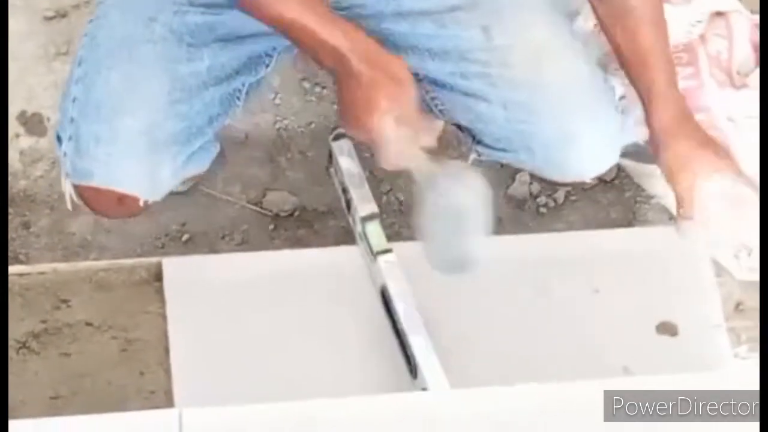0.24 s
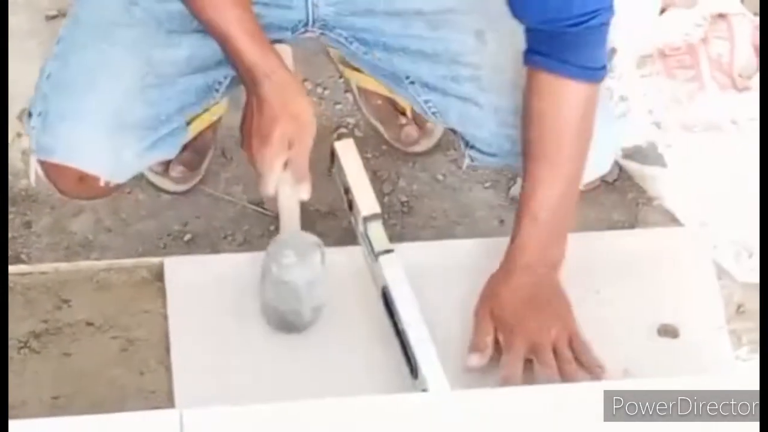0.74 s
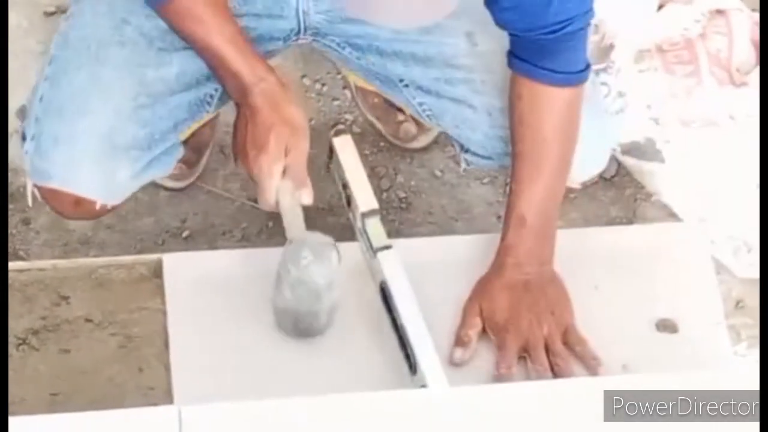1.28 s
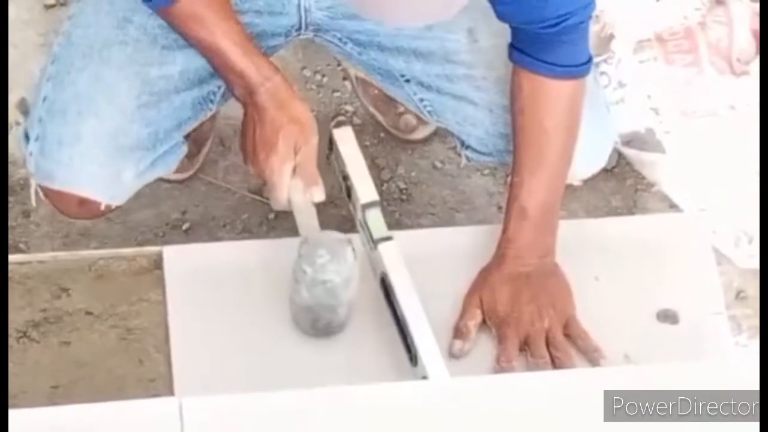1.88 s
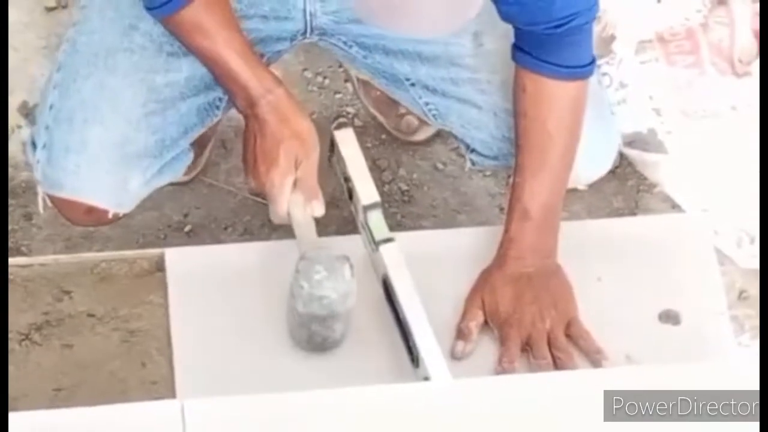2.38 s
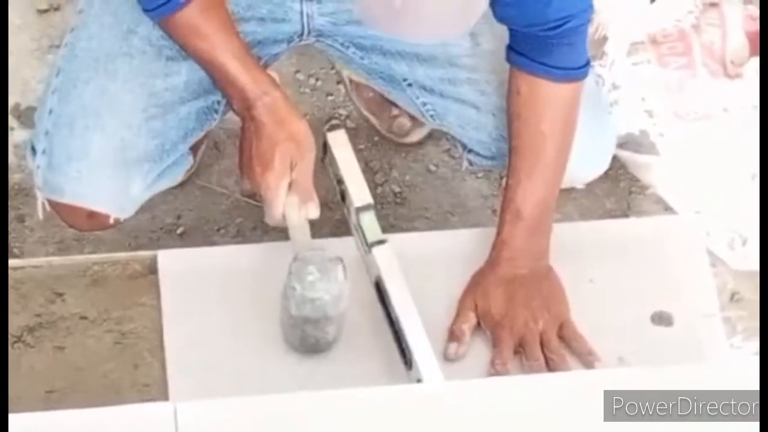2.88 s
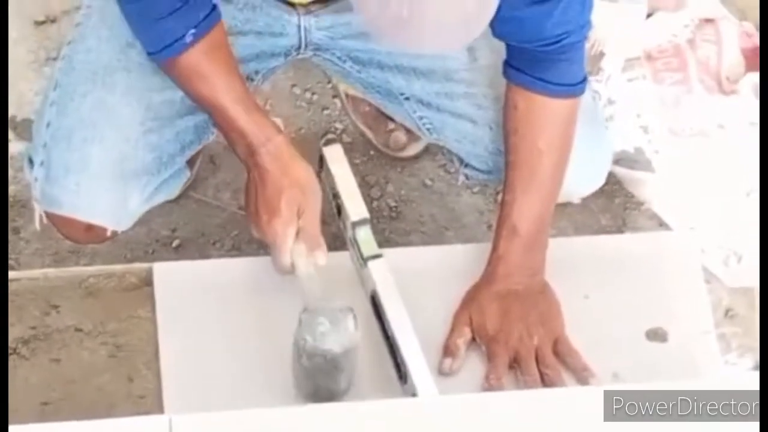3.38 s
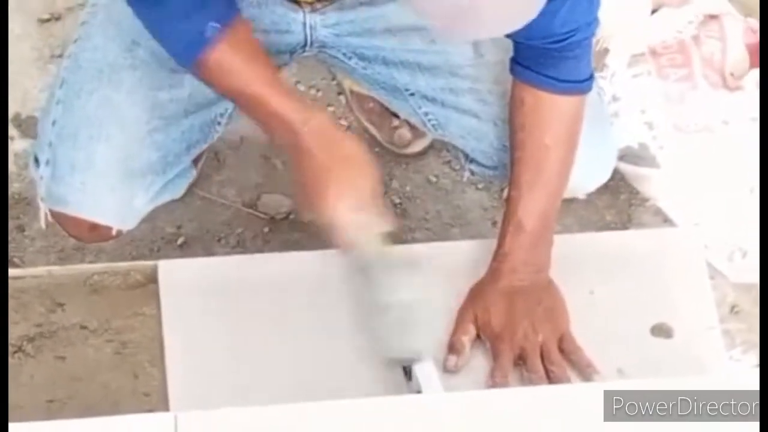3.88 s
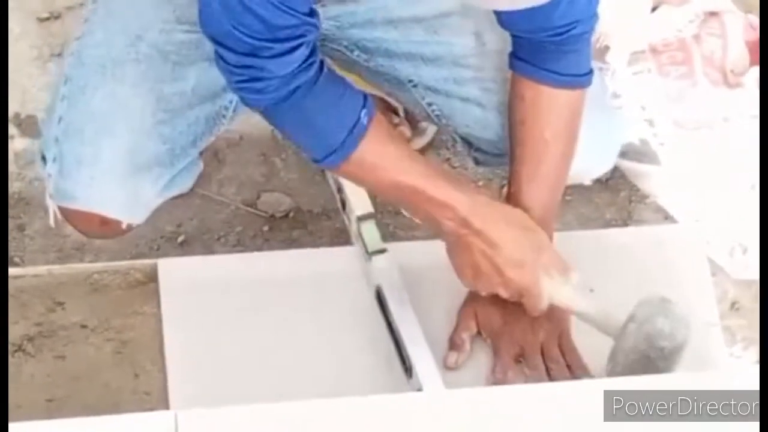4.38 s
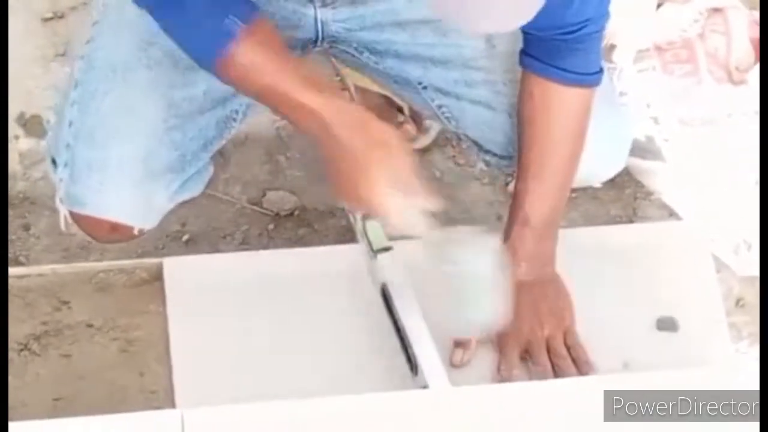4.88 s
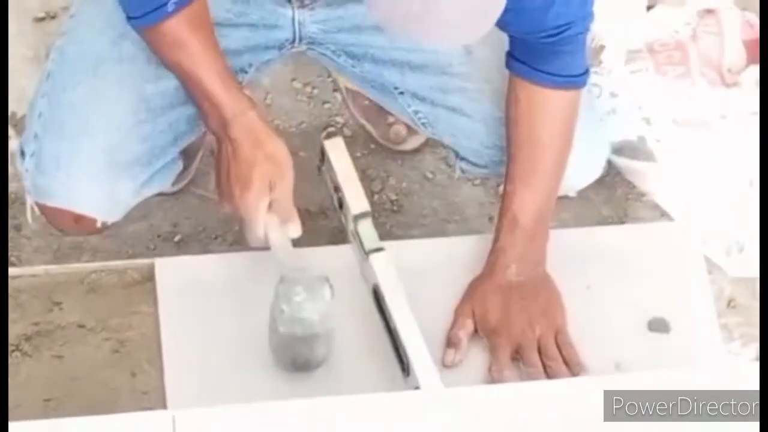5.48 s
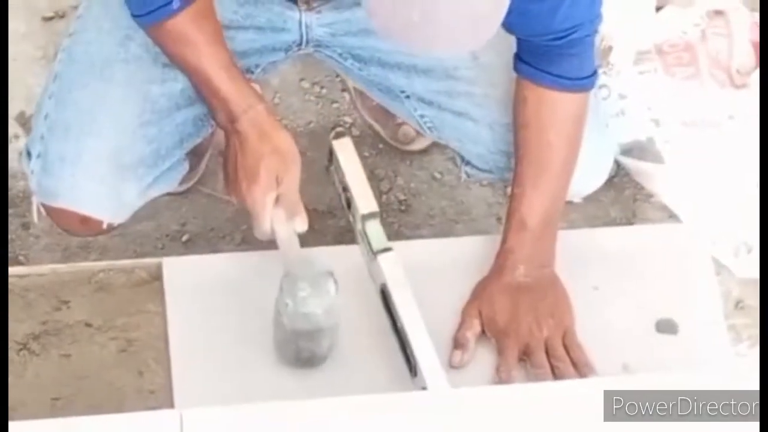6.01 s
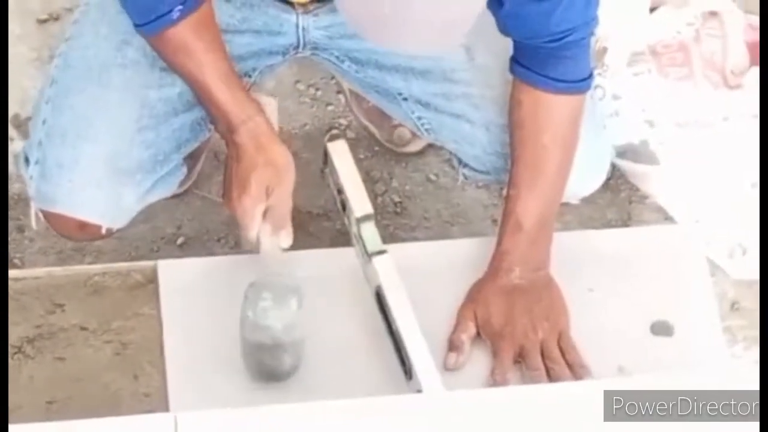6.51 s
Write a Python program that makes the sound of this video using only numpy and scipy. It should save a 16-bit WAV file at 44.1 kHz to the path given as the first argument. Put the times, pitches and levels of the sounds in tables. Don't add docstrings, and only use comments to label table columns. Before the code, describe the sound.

In a bare concrete stairwell, a rubber mallet gives light taps on a tile, then three heavier blows and three soft edge taps. Grit scrapes during a pause, then a steady run of firm thuds follows. It stops; grit scuffs, a hard tool clacks and hollow knocks end it. A small nearby microphone catches the hard wall echoes over faint site noise.

```python
import sys
import numpy as np
from scipy import signal
from scipy.io import wavfile
from scipy.ndimage import uniform_filter1d

SR = 44100
rng = np.random.default_rng(int(sys.argv[2]) if len(sys.argv) > 2 else 0)


def magnitude_from_level(level_db):
    exponent = np.asarray(level_db, float) / 20
    return 10 ** exponent


def persist_wave(psi):
    counts = np.round(np.clip(psi, -1, 1) * 32767).astype(np.int16)
    wavfile.write(sys.argv[1], SR, np.atleast_2d(counts).T)


N = 297596

# (time [s], thud peak [dB], tile ring [dB], slap [dB], shaken grit [dB])
BLOWS = [(-0.04, -28, -44, -35.5, -54), (0.1122, -18.5, -45, -39.5, -63), (0.3241, -15.5, -40, -34, -50),
         (0.4839, -20, -47, -41.5, -59), (0.7212, -21.5, -46.5, -41.5, -65), (0.9404, -15, -43, -33.5, -56),
         (1.2649, -6.5, -30, -28.5, -43), (1.4792, -6.5, -31.5, -31, -49.5),
         (1.6666, -2.5, -26, -23.5, -35.5), (3.1915, -8, -39.5, -30.5, -49),
         (3.4021, -4.5, -38.5, -28, -46.5), (3.6076, -5.5, -36, -27.5, -41), (3.8052, -6, -37, -28, -44.5),
         (3.997, -6, -49, -27, -41), (4.1763, -5.5, -38, -28, -50.5), (4.3497, -6.5, -51, -28, -43),
         (4.5721, -6.5, -56, -32.5, -48.5), (4.7456, -7, -41.5, -33, -50), (4.8917, -10.5, -38, -37.5, -55)]
# (time [s], thud peak [dB], tile ring [dB], slap [dB],
# shaken grit [dB])
FAR_BLOWS = [
    (2.2148, -16, -75, -34, -51),
    (2.4153, -19, -63, -34, -59),
    (2.5870, -21.5, -65, -36.5, -47.5),
]


def evened(x):
    return x / np.sqrt(np.mean(x ** 2) + 1e-20)


def read(points, hz):
    f, value = np.transpose(points)
    return np.interp(np.log(hz + 1), np.log(f + 1), value)


def add(mix, s, sound):
    part = mix[round(s * SR):][:len(sound)]
    part += sound[:len(part)]


def coloured(x, points):
    log_gain = np.log(magnitude_from_level(read(points, abs(np.fft.fftfreq(4096, 1 / SR)))))
    taps = np.fft.ifft(np.exp(np.conj(signal.hilbert(log_gain)))).real[:2048]
    return signal.oaconvolve(x, taps)[:len(x)]


def resonate(x, hz, width):
    turn = np.exp(2j * np.pi * np.cumsum(hz * np.ones(len(x))) / SR)
    r = np.exp(-np.pi * width / SR)
    smooth = signal.lfilter([1 - r], [1, -r], x / turn)
    return 2 * (turn * smooth).real


def ring(modes, rise):
    t = np.arange(SR // 2) / SR
    tones = sum(magnitude_from_level(db - 60 * t / t60) * np.sin(2 * np.pi * hz * t) for hz, db, t60 in modes)
    x = tones * (1 - np.exp(-t / rise))
    return x / np.std(x[:SR // 20])


def echoed(x, echoes):
    taps = np.zeros(SR // 5)
    taps[0] = 1
    for s, db in echoes:
        taps[round(s * SR)] += magnitude_from_level(db)
    return signal.oaconvolve(x, taps)[:len(x)]


def stairwell(x, build, early=0, fade=0.042):
    # (frequency [Hz], time to fall 60 dB [s])
    fall_times = [(150, 0.31), (300, 0.61), (900, 0.73), (2500, 0.75), (5000, 0.57), (10000, 0.2)]
    taps = np.zeros(SR)
    at = np.arange(100, SR - 20, 20) + rng.integers(0, 20, (SR - 101) // 20)
    swell = 1 - np.exp(-(at / SR / build) ** 2)
    near_walls = 1 + early * np.exp(-(at / SR / fade) ** 2)
    taps[at] = rng.choice([-1., 1.], at.shape) * swell * near_walls
    hz, t, z = signal.stft(taps, SR, nperseg=512)
    dying = magnitude_from_level(-60 * t / read(fall_times, hz)[:, None])
    tail = signal.istft(z * dying, SR, nperseg=512)[1]
    return signal.fftconvolve(x, tail / np.linalg.norm(tail))[:len(x)]


def thud(hz, cycles):
    t = np.arange(1000) / SR
    u = t * hz / cycles
    touch = 0.12 * np.exp(-((t - 0.0012) / 0.00044) ** 2)
    push = u ** 4 * np.exp(4 * (1 - u)) * np.sin(2 * np.pi * cycles * u)
    return -touch - push


def mallet(blows, echoes, cycles, top_hz, boom_db):
    # (frequency [Hz], level [dB], time to fall 60 dB [s])
    tile_modes = [(838.5, -4.5, 0.17), (877, -6, 0.17), (820, -6, 0.091), (707, -9.5, 0.09),
                  (552, -11, 0.21), (1163, -9.5, 0.071), (1360, -14.5, 0.027)]
    # (frequency [Hz], level [dB], time to fall 60 dB [s])
    boom_modes = [(119.1, 7.5, 0.33), (166, -13.5, 0.17), (200, -1.5, 0.18), (427.4, -1, .08),
                  (460, -0.5, 0.2), (477, -4.5, 0.2)]
    # (frequency [Hz], level [dB])
    slap_colour = [(300, -38), (650, 10.5), (1000, 5.5), (1600, 1), (2300, -5), (3600, -12.5),
                   (5000, -17.5), (7400, -8), (9000, -10.5), (13000, -20)]
    lead = .1
    pitch_per_db = 3.5
    boom_follows = 0.44
    low, tile, grit = np.zeros((3, N + round(lead * SR)))
    t = np.arange(3000) / SR
    for s, thud_db, ring_db, slap_db, _ in blows:
        add(low, lead + s, magnitude_from_level(thud_db) * thud(top_hz + pitch_per_db * thud_db, cycles))
        add(low, lead + s, magnitude_from_level(boom_db + boom_follows * thud_db) * ring(boom_modes, 0.008))
        add(tile, lead + s + 0.00401, magnitude_from_level(ring_db - 0.5) * ring(tile_modes, 0.011))
        rattle = (1 - np.exp(-t / 0.0067)) * np.exp(-t / 0.0047) * rng.standard_normal(len(t))
        rattle[0] += 9
        add(grit, lead + s + 0.001014, magnitude_from_level(slap_db + 12) * coloured(rattle, slap_colour))
    heard = echoed(low + magnitude_from_level(-15.5) * grit, echoes)
    heard += magnitude_from_level(-12.5) * stairwell(low, build=0.12)
    heard += stairwell(grit, build=0.0041, early=1.13, fade=0.022)
    heard += tile + magnitude_from_level(-14) * stairwell(tile, build=.012)
    return heard[round(lead * SR):]


def scrapes():
    # (loudest time [s], level [dB], rise [s], fall [s], brightness [dB])
    strokes = [(.04, -57, .05, 0.097, -24), (0.335, -43, 0.045, 0.095, -10.5),
               (0.55, -49, 0.046, 0.11, -7.5), (.65, -48.5, 0.057, 0.042, -18),
               (0.84, -54.5, .03, 0.44, -12), (1.09, -61, .05, 0.092, -16), (1.44, -50, 0.13, .15, -11),
               (1.746, -39, 0.033, 0.079, -7), (1.9, -49, .08, .2, -19), (2.12, -35.5, 0.1, 0.091, -9.5),
               (2.19, -29, .1, .08, -12.5), (2.476, -44, 0.18, 0.18, -15.5), (2.82, -67, .04, 0.12, 1.5),
               (2.95, -53, 0.022, .4, -9.5), (3.292, -46.5, 0.031, 0.12, -9.5),
               (5.11, -56.5, 0.15, 0.14, -5.5), (5.43, -66, .2, 0.069, -22), (5.63, -44, 0.019, 0.055, -15),
               (5.704, -36, 0.029, 0.11, -8.5), (5.834, -35.5, 0.045, 0.057, -8.5),
               (6.54, -54, 0.076, .3, -4.5), (6.64, -34, 0.014, 0.09, -15.5),
               (6.675, -34.5, 0.055, 0.048, -12.5), (6.744, -29, 0.019, 0.0086, -14.5)]
    # (frequency [Hz], level [dB])
    coarse_colour = [(300, -25), (700, -27), (1100, -15), (1600, -7.5), (2300, -3.5), (3100, 2.5),
                     (3700, -2), (4600, 0.5), (6000, -19), (9000, -33)]
    # (frequency [Hz], level [dB])
    fine_colour = [(3500, -44), (5500, -0.5), (7400, 3), (9500, 1.5), (13000, -9)]
    bed_db, bed_bright_db = -59, -15.5
    rise_s, fall_s, shake_bright_db = .003, 0.054, -14
    shakes = [(s + rise_s, db, rise_s / 2, fall_s, shake_bright_db) for s, *_, db in BLOWS + FAR_BLOWS]

    t = np.arange(0, N, 32) / SR
    coarse = magnitude_from_level(2 * bed_db)
    fine = magnitude_from_level(2 * (bed_db + bed_bright_db))
    for s, db, rise, fall, bright_db in strokes + shakes:
        power = magnitude_from_level(2 * db - 24 * np.maximum((s - t) / rise, (t - s) / fall))
        coarse = coarse + power
        fine = fine + power * magnitude_from_level(2 * bright_db)
    coarse, fine = (np.interp(np.arange(N) / SR, t, np.sqrt(p)) for p in (coarse, fine))

    struck = rng.random(N) < 6000 / SR
    grains = rng.standard_normal(N) * magnitude_from_level(3.2 * rng.exponential(1, N)) * struck
    grains = evened(grains) + 1.02 * evened(stairwell(grains, build=0.014))
    coarse_sound = coarse * evened(coloured(grains, coarse_colour))
    return coarse_sound + magnitude_from_level(16.0) * fine * evened(coloured(grains, fine_colour))


def clack():
    # (frequency [Hz], level [dB])
    crack_colour = [(100, -11.5), (250, -1), (500, -6.5), (950, -11), (1500, 0.5), (2400, 0.5), (2800, -1),
                    (3150, -12.5), (3550, 0.5), (3700, 3), (3900, 1.5), (4300, -16), (5500, -7.5),
                    (12000, -32)]
    # (delay [s], level [dB])
    crack_echoes = [(.0013, -5), (.0068, -2), (.0085, -3), (.0125, -5), (.0162, -3), (.022, -6),
                    (.0282, -5)]
    crack = np.zeros(N)
    crack[round(5.9402 * SR)] = magnitude_from_level(8)
    crack = coloured(crack, crack_colour)
    return echoed(crack, crack_echoes) + magnitude_from_level(8) * stairwell(crack, build=0.0066, early=0.81, fade=0.036)


def knocks():
    # (time [s], level [dB], pitch [Hz], width [Hz])
    bumps = [
        (6.514, -44, 846, 150),
        (6.577, -40.5, 660, 150),
        (6.58, -46.5, 830, 200),
        (6.596, -51, 816, 300),
        (6.625, -50.5, 653, 300),
        (6.655, -43, 840, 200),
        (6.68, -48, 820, 200),
    ]
    out = np.zeros(N)
    t = np.arange(3000) / SR
    for s, db, hz, width in bumps:
        puff = rng.standard_normal(len(t)) * (t / .006) ** 2 * np.exp(-t / 0.0074)
        body = resonate(resonate(puff, hz, width), hz, width)
        body += magnitude_from_level(-9) * resonate(puff, 1.3 * hz, 600)
        add(out, s, magnitude_from_level(db) * evened(body))
    return out + magnitude_from_level(-8.5) * stairwell(out, build=0.019, early=1.5)


def squeaks():
    # (start [s], end [s], pitch [Hz], level [dB], width [Hz])
    single = [(.48, .53, 1850, -55, 40), (.63, .76, 1885, -54.5, 72), (1.07, 1.3, 1767, -58.5, 12),
              (1.332, 1.42, 1760, -52.5, 20), (1.55, 1.655, 1780, -58, 20), (1.957, 2.036, 2680, -48, 56),
              (3.015, 3.124, 693, -54, 6), (3.268, 3.594, 8880, -44.5, 21), (3.422, 3.56, 3200, -61.5, 54),
              (4.036, 4.137, 2520, -53, 50), (4.257, 4.353, 1467, -44.5, 36), (4.21, 4.243, 1550, -49, 40),
              (6.324, 6.48, 612, -54, 11)]
    # (pitch [Hz], level [dB], width [Hz])
    frame_tones = [(2700, -52.5, 140), (4360, -47, 22), (9700, -46.5, 140)]
    # (start [s], length [s], strength [dB], middle tone [dB])
    frame_rubs = [
        (0.827, 0.12, 0.5, -1.5),
        (1.331, 0.16, 2.5, -15.5),
        (2.948, 0.19, -3, -4),
        (3.47, .13, -3.5, -16),
    ]
    whistles = list(single)
    for s, length, strength_db, middle_db in frame_rubs:
        for k, (hz, db, width) in enumerate(frame_tones):
            whistles.append((s, s + length, hz, db + strength_db + middle_db * (k == 1), width))
    out = np.zeros(N)
    for start, end, hz, db, width in whistles:
        noise = rng.standard_normal(SR)[:round((end - start) * SR)]
        line = evened(resonate(resonate(noise, hz, width), hz, width))
        add(out, start, magnitude_from_level(db) * line * signal.windows.tukey(len(line), .4))
    return out + magnitude_from_level(-16) * stairwell(out, build=.02)


def site():
    # (frequency [Hz], level [dB])
    wash_colour = [(25, -36.5), (50, -6.5), (100, -1), (160, -1), (320, -2.5), (550, -11), (750, -10),
                   (1100, -15.5), (2200, -16.5), (3100, -18), (5000, -19.5), (7400, -14.5), (13000, -20.5)]
    # (time [s], level [dB])
    machine_load = [(0.0, -34), (0.109, -44), (0.8, -41.5), (1.2, -50), (1.62, -41), (1.8, -45),
                    (2.03, -41.5), (2.2, -44), (2.5, -42), (3.1, -44.5), (3.5, -40.5), (4.3, -42),
                    (4.64, -42), (4.8, -47.5), (5.6, -53), (5.84, -42), (6.05, -49), (6.75, -53.5)]
    wash_db, drone_hz = -43, 130.8
    wash_follows = 0.18
    frames, hz = N // 256 + 5, np.fft.rfftfreq(1024, 1 / SR)
    a, b, patches = rng.standard_normal((frames, 513, 3)).T
    patches = evened(uniform_filter1d(uniform_filter1d(patches, 12, 0), 14, 1))
    spectrum = (a + 1j * b) * magnitude_from_level(read(wash_colour, hz)[:, None] + 2.44 * patches)
    wash = signal.istft(spectrum, nperseg=1024, noverlap=768)[1][:N]
    drone = evened(resonate(resonate(rng.standard_normal(N), drone_hz, 64), drone_hz, 75))
    s, level_db = np.transpose(machine_load)
    load_db = np.interp(np.arange(N) / SR, s, level_db)
    wash_gain = magnitude_from_level(wash_db + wash_follows * (load_db - load_db.mean()))
    return wash_gain * evened(wash) + magnitude_from_level(load_db) * drone


def scene():
    # (delay [s], level [dB])
    tile_echoes = [(0.0055, -16.4), (0.009, -11.4), (0.0101, -12.3), (0.012, -3.8), (0.0154, -4.0),
                   (0.0188, -14.5), (0.0227, -15.7), (0.0319, -11.6), (0.035, -6.0), (0.0405, -13.3),
                   (0.0501, -13.1), (0.0538, -16.8), (0.0612, -17.5), (0.0644, -15.7), (0.0802, -18.0),
                   (0.0918, -21.5), (0.0988, -16.8), (0.1081, -16.3), (0.1194, -17.9), (0.1283, -21.3)]
    # (delay [s], level [dB])
    far_echoes = [(0.0053, -7.5), (0.0117, -16.5), (0.0148, -2.5), (0.0208, -11.7), (0.0315, -2.9),
                  (0.0353, -2.1), (0.0407, -6.0), (0.0449, -9.3), (0.0497, -9.0), (0.0543, -13.1),
                  (0.0688, -11.6), (0.0728, -10.7)]
    blows = mallet(BLOWS, tile_echoes, cycles=1.178, top_hz=322.2, boom_db=-36.5)
    blows += mallet(FAR_BLOWS, far_echoes, cycles=1.0, top_hz=338, boom_db=-30.0)
    return (blows + scrapes() + clack() + knocks() + squeaks() + site())[None]


def roll_off(x):
    return signal.sosfilt(signal.butter(12, 13100, fs=SR, output="sos"), x)


def record(dry):
    # (frequency [Hz], level [dB])
    microphone = [(3600, 1), (3950, -5), (4300, -9), (4700, -15), (5400, -18.5), (6500, -16), (7400, -12),
                  (8100, -17.5), (8600, -23.5), (9500, -28), (10300, -28.5), (13000, -29)]
    low_cut = signal.butter(2, 65, "high", fs=SR, output="sos")
    mix = signal.sosfilt(low_cut, coloured(dry[0], microphone))[None]
    return roll_off(mix)


dry = scene()
out = record(dry)
persist_wave(out)
```